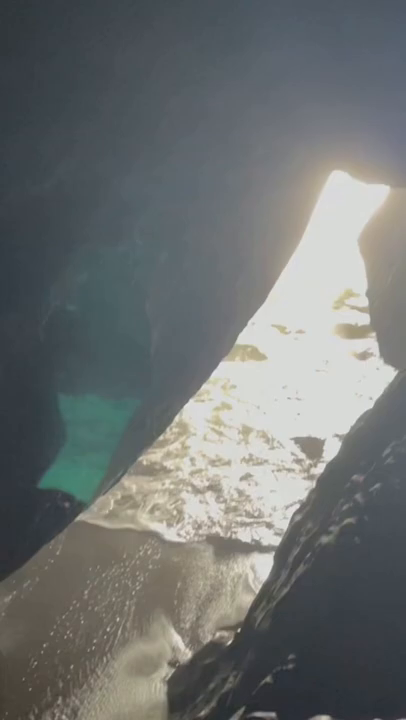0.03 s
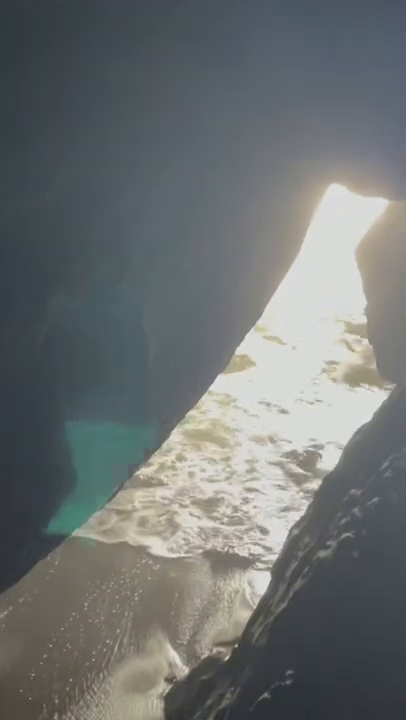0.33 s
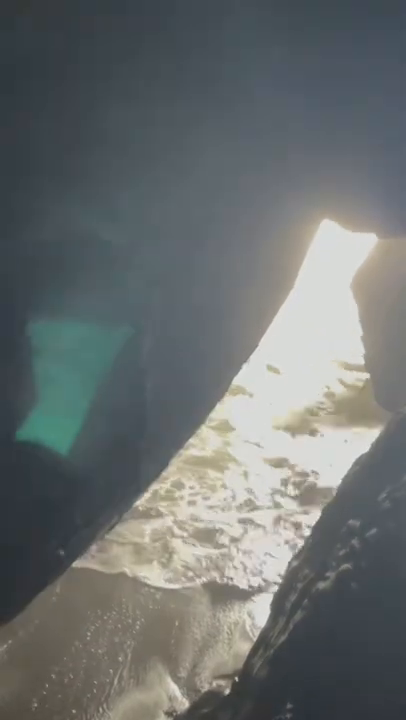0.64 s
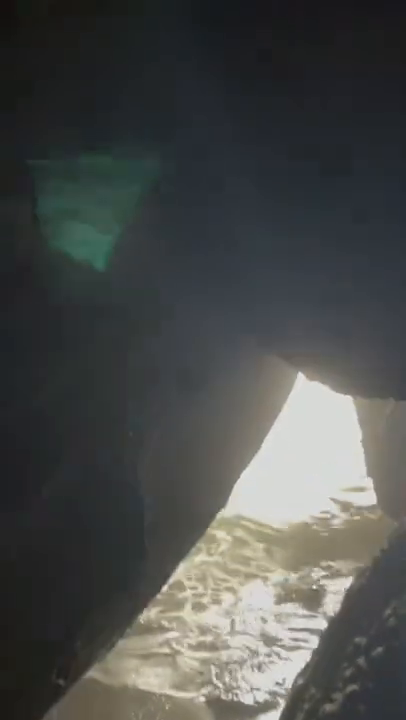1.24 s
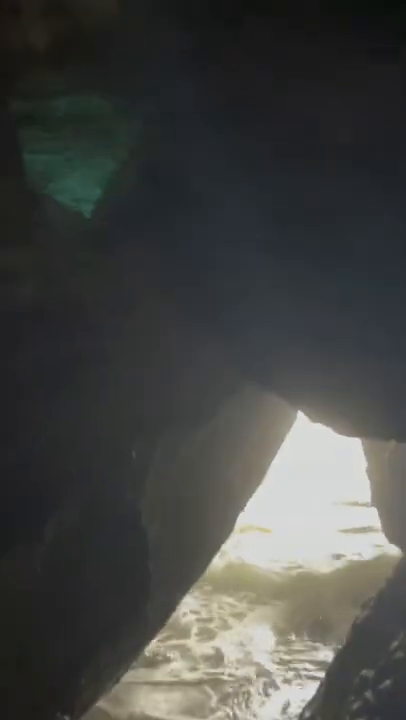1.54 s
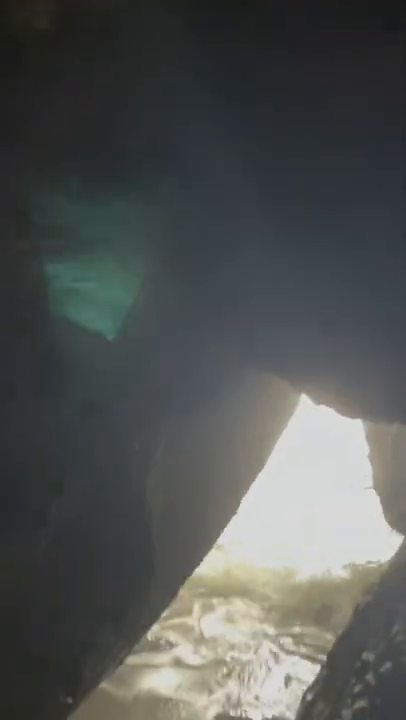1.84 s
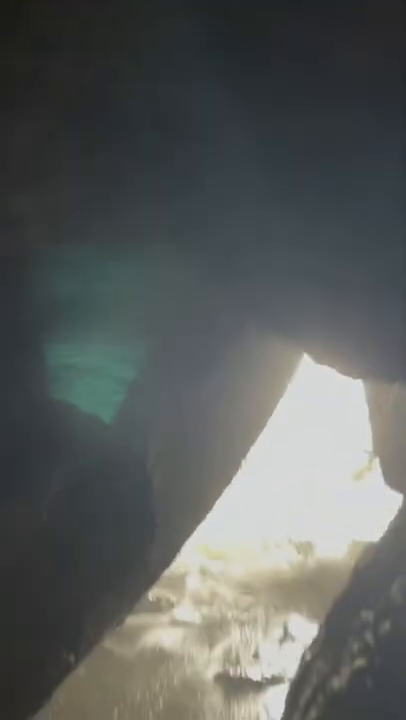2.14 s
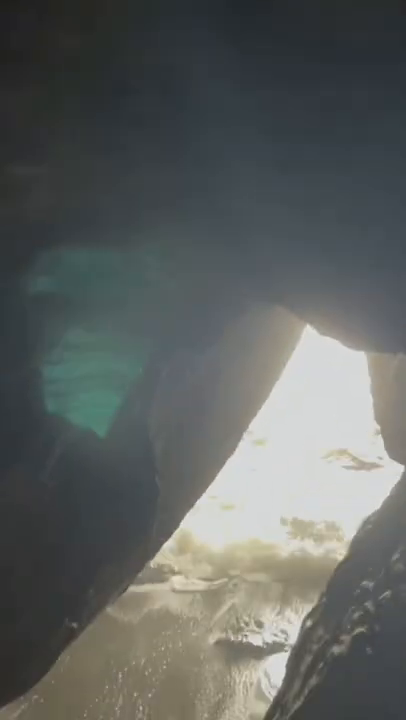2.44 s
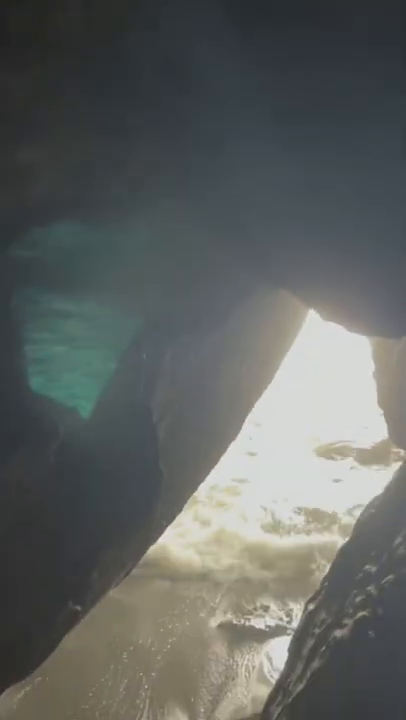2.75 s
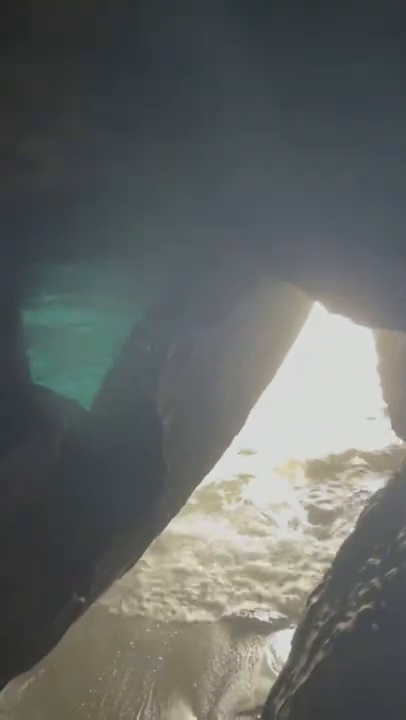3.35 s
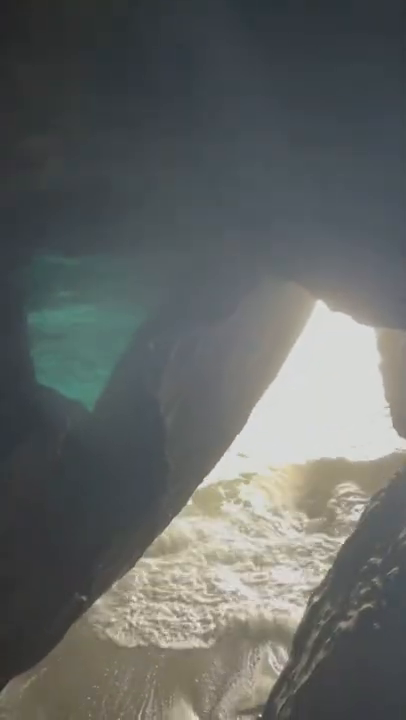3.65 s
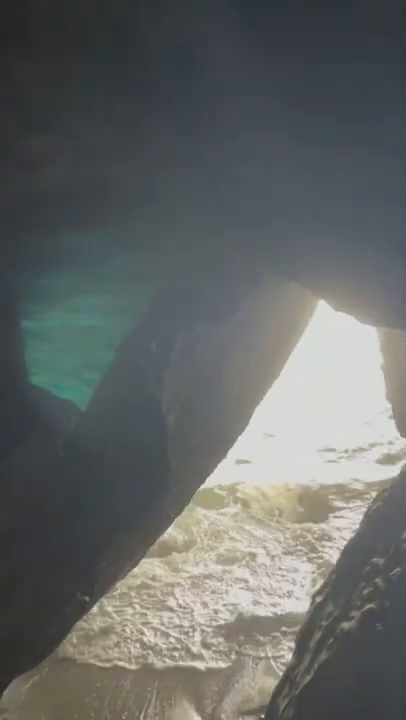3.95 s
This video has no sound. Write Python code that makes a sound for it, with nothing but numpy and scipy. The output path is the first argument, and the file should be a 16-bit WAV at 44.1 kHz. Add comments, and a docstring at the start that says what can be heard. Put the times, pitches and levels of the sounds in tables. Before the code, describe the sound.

Ocean surf roars low and steady, heard from inside a slightly hollow sea cave, with brief dull booms among the rocks throughout. From about 1.3 seconds a wave builds at the opening, breaking at 2 seconds with a deep rumble and bubbling gurgle. It stays loud until about 3 seconds while foam hisses up the sand. From around 3.3 seconds the wash dies back toward the steady sea roar.

```python
"""The open sea roars steadily beyond the mouth of a sea cave, with dull booms among the rocks
where water traps air in hollows. Then one wave breaks at the opening: its roar swells over the deep
rumble of tumbling water, folded-in air gurgles as bubbles, and its foam hisses up the sand and
dies back. All of it is heard from inside, coloured by the cave's resonances and faint short echoes."""
import sys
import numpy as np
from scipy import signal
from scipy.fft import rfft, irfft
from scipy.io import wavfile
from scipy.ndimage import uniform_filter1d, map_coordinates

SR = 44100
rng = np.random.default_rng(int(sys.argv[2]) if len(sys.argv) > 2 else 0)


def inscribe(sig):
    """Save sig as 16-bit PCM at rate SR to the path in sys.argv[1].

    A 1-D sig is mono; a 2-D sig holds one channel per row.
    Samples are clipped to [-1, 1] before scaling.
    """
    pcm = np.round(np.clip(np.atleast_2d(sig).T, -1, 1) * 32767)
    wavfile.write(sys.argv[1], SR, pcm.astype(np.int16))


N = 176400
T = np.arange(N) / SR
F = np.maximum(np.arange(N // 2 + 1) * SR / N, 1)


def undb(db):
    """Decibels to gain."""
    return 10 ** (np.asarray(db) / 20)


def fader(rows):
    """Gain over time from (time_s, level_db) points."""
    return undb(np.interp(T, *np.array(rows).T))


def across(rows):
    """(freq_hz, value) points joined on a log-frequency axis."""
    hz, value = np.array(rows).T
    return np.interp(np.log(F), np.log(hz), value)


def wander(rate_hz):
    """Smooth random motion with a spread of 1."""
    motion = irfft(rfft(rng.standard_normal(N)) / (1 + (F / rate_hz) ** 4) * F / (F + 2), N)
    return motion / motion.std()


def pan(x, left_db):
    """Lean a stereo sound to one side; left_db is left minus right."""
    return x * undb(np.array([[left_db], [-left_db]]) / 2)


# How alike left and right are: freq_hz, correlation
STEREO_LIKENESS = [(60, 0.88), (250, 0.91), (600, 0.71), (1200, 0.59), (1750, 0.3), (2200, 0.64),
                   (4000, 0.58), (6000, 0.77), (9000, 1), (14000, 0.6)]
def place(spectra, colour_db):
    """Two unrelated spectra become a coloured stereo pair, narrow in the bass, widest in the upper mids."""
    likeness = np.clip(across(STEREO_LIKENESS), 0, .97)
    mid = spectra[0] * np.sqrt((1 + likeness) / 2)
    side = spectra[1] * np.sqrt((1 - likeness) / 2)
    return irfft(np.array([mid + side, mid - side]) * undb(colour_db), N)


def churn(colour, surge_db, flicker_db, flicker_hz):
    """Turbulent water: octave bands of noise that surge together and flicker alone."""
    noise = rfft(rng.standard_normal((2, N))) * np.sqrt(SR / 2)
    surge = surge_db * wander(rate_hz=4.2)
    out = 0
    for octave in range(4, 15):
        band = np.maximum(1 - np.abs(np.log2(F) - octave), 0)
        out = out + irfft(noise * band, N) * undb(surge + flicker_db * wander(flicker_hz))
    return place(rfft(out), across(colour))


def pops(per_s, spread_db):
    """Two random trains of clicks of uneven size, rms 1."""
    hits = rng.random((2, N)) < per_s / SR
    polarity = rng.choice([-1, 1], (2, N))
    size = undb(spread_db * np.minimum(rng.exponential(size=(2, N)), 4))
    clicks = hits * polarity * size
    return clicks / (clicks.std() + 1e-12)


def cave_echo(x, t60_s=0.56, wet_db=-14):
    """Rock walls add a short dense tail."""
    tail = rng.standard_normal((2, SR)) * undb(-60 * T[:SR] / t60_s)
    tail *= undb(wet_db) / np.sqrt(np.sum(tail ** 2) / 2)
    return x + signal.fftconvolve(x, tail, axes=1)[:, :N]


# Resonances of the cave: freq_hz, width_hz, lift_db
CAVE_MODES = [(55, 10, 2), (187, 17, 1.5), (316, 24, 2), (447, 42, 3), (573, 29, 3.5), (790, 46, 1)]
def cave_hollow(x):
    """The cave's resonances lift a few narrow bands in the bass and low mids."""
    lift_db = sum(db / (1 + (2 * (F - hz) / width) ** 2) for hz, width, db in CAVE_MODES)
    return irfft(rfft(x) * undb(lift_db), N)


# Short echo taps: delay_s, gain
ECHO_TAPS = [(.00092, 0.053), (.00302, 0.04), (.0093, .06), (0.0198, 0.071)]
def drifting_echoes(x, drift_s=.00015, drift_hz=.7):
    """Faint short echoes with slowly drifting delays give the water a shifting, comb-like colour."""
    out = x
    for delay_s, gain in ECHO_TAPS:
        read_at = (T - delay_s - drift_s * wander(drift_hz)) * SR
        out = out + gain * np.array([map_coordinates(channel, [read_at], order=1) for channel in x])
    return out


# Tone of the open sea: freq_hz, level_db
SEA_COLOUR = [(18, -78), (30, -75), (46, -50.5), (90, -51.5), (200, -57), (400, -63.5), (900, -67),
              (1300, -70.5), (2000, -75), (2750, -83), (4000, -85), (6500, -92.5), (10000, -97.5),
              (15000, -103)]
# Its slow heave: time_s, level_db
SEA_HEAVE = [(0, -0.5), (.43, 0.94), (.75, 0.1), (.98, -0.4), (1.35, 0.1), (2, -1), (4, 0.7)]
def open_sea():
    """Water churning beyond the mouth lays down a steady, gently heaving roar."""
    return churn(SEA_COLOUR, surge_db=0.5, flicker_db=1.08, flicker_hz=24.7) * fader(SEA_HEAVE)


# Tone of the noise in a boom: freq_hz, level_db
BOOM_COLOUR = [(20, -73), (45, -44), (80, -41.5), (150, -46), (280, -49.5), (450, -65), (1000, -104)]
# Boom cues: peak_s, level_db, half_length_s, pitch_hz
BOOM_CUES = [(0.171, 3.5, 0.013, 88), (0.67, -3, .02, 115), (.711, 0, 0.0063, 170),
             (0.754, -3.5, 0.0089, 72), (0.805, -3, .012, 150), (0.835, -7, .01, 68), (.868, 3, .0085, 95),
             (1.204, -1.5, .018, 130), (1.448, -2, .011, 90), (1.52, -8, 0.033, 100),
             (1.607, -4.5, .015, 92), (2.093, 5, 0.014, 85), (2.284, 4, .009, 160), (2.477, 5.5, .016, 88),
             (2.578, 1.5, .016, 75), (2.646, 2, 0.019, 90), (2.74, 1.5, .024, 110), (3.093, 4, .013, 95),
             (3.275, -2, .028, 135), (3.646, 3.5, .013, 125)]
def booms(tone_db=-22.5, noise_db=-4.5, sag_oct_per_s=16):
    """Air trapped by water in rock hollows throbs briefly, sagging in pitch, in a swell of low noise."""
    noise = rfft(rng.standard_normal((2, N))) * np.sqrt(SR / 2)
    low = place(noise, across(BOOM_COLOUR) + noise_db)
    power = np.mean(np.abs(signal.hilbert(low)) ** 2, axis=0)
    low = low * np.sqrt(power.mean() / uniform_filter1d(power, size=500))  # even out the noise
    out = 0
    for (peak_s, db, half_s, hz), phase in zip(BOOM_CUES, rng.random(len(BOOM_CUES))):
        pitch_hz = hz * 2 ** (-sag_oct_per_s * np.clip(T - peak_s, -2 * half_s, 2 * half_s))
        throb = np.sqrt(2) * undb(tone_db) * np.sin(2 * np.pi * (phase + np.cumsum(pitch_hz) / SR))
        swell = np.exp(-.5 * ((T - peak_s) / half_s) ** 2)
        out = out + (low + throb) * undb(db) * swell
    return out


# Tone of the foam: freq_hz, level_db
FOAM_COLOUR = [(500, -80), (1500, -64), (2700, -71), (3800, -70.5), (5300, -74), (6500, -77), (9000, -78.5),
               (11000, -82), (13500, -82), (15500, -114)]
# Its run up the sand: time_s, level_db
FOAM_SWELL = [(0, -38), (1.3, -26), (1.7, -13.2), (1.85, -5.5), (2.0, -1), (2.25, -1.7), (2.6, 1),
              (2.88, -1.5), (3.0, 0), (3.24, -0.8), (3.3, -4.4), (3.5, -7.7), (3.68, -8), (4, -9)]
def foam(spray_per_s=2700, spray_db=-13):
    """Foam on the sand: a smooth hiss with the fine crackle of bursting spray tucked under it."""
    hiss = churn(FOAM_COLOUR, surge_db=0.76, flicker_db=.5, flicker_hz=25)
    crackle = rfft(pops(spray_per_s, spread_db=0.5)) * np.sqrt(SR / 2)
    spray = place(crackle, across(FOAM_COLOUR) + spray_db)
    return (hiss + cave_echo(spray)) * fader(FOAM_SWELL)


def bubbles(pitches=20, per_s=800, decay_cycles=17, tilt_db_per_oct=-3.5):
    """Air folded into the wave rings as brief notes that rise a little."""
    out, t = 0, T[:SR // 10]
    for hz in np.geomspace(350, 4000, pitches) * np.exp(0.039 * rng.standard_normal(pitches)):
        age = t * hz / decay_cycles
        rise = 1 + 0.075 * np.minimum(age, 2)
        note = np.sin(2 * np.pi * hz * t * rise) * np.exp(-2 * age)
        note *= undb(tilt_db_per_oct * np.log2(hz / 1000)) / np.linalg.norm(note)
        triggers = pops(per_s / pitches, spread_db=-1.5)
        out = out + signal.oaconvolve(triggers, note[None], axes=1)[:, :N]
    return cave_echo(place(rfft(out / out.std()), colour_db=-35.5))


# Tone of the wave's low weight and of its roar: freq_hz, level_db
RUMBLE_COLOUR = [(18, -70), (30, -71), (46, -44), (88, -40.5), (125, -44.5), (190, -43), (280, -58),
                 (500, -64), (1000, -102)]
ROAR_COLOUR = [(60, -82), (160, -50), (280, -50), (400, -49), (600, -51.5), (900, -54.5), (1300, -58),
               (2000, -62), (2750, -71), (4000, -74.5), (7000, -82.5), (15000, -105)]
# How each builds and falls away: time_s, level_db
RUMBLE_SWELL = [(0, -36), (1.3, -16.5), (1.8, -12), (2.05, -1), (2.4, -0.3), (2.7, 0), (2.95, -3.5),
                (3.3, -7.5), (3.6, -6), (4, -14.5)]
ROAR_SWELL = [(0, -31), (1.1, -26), (1.4, -16.5), (1.72, -12), (1.9, -6), (2.03, -0.7), (2.17, -1),
              (2.38, -0.5), (2.49, 0.8), (2.62, -0.7), (2.8, -2.2), (3.02, -4.5), (3.22, -2), (3.48, -9),
              (3.7, -9.5), (4, -10)]
def breaker():
    """The mass of water tumbles: rumble below, roar and bubbles above."""
    rumble = churn(RUMBLE_COLOUR, surge_db=-0.1, flicker_db=0.5, flicker_hz=20)
    roar = churn(ROAR_COLOUR, surge_db=.5, flicker_db=1.37, flicker_hz=33.3)
    return rumble * fader(RUMBLE_SWELL) + (roar + bubbles()) * fader(ROAR_SWELL)


def scene():
    """All the water, coloured by the hollow of the cave and faint drifting echoes."""
    background = pan(open_sea() + booms(), left_db=-0.1)
    water = background + pan(breaker(), left_db=-0.5) + foam()
    return drifting_echoes(cave_hollow(water))


# Stereo balance: freq_hz, left_minus_right_db
STEREO_BALANCE = [(60, 1), (150, -1.8), (500, -0.3), (1900, 0), (2800, 3.5), (4000, 1), (5200, 2.5),
                  (7000, -0.5)]
def record(dry, lag_s=.00018, lag_above_hz=5200, start_s=.036, top_hz=14100):
    """Treble reaches the left channel slightly late; the sound opens abruptly, its top cut."""
    left, right = rfft(dry)
    lean = undb(across(STEREO_BALANCE) / 2)
    late = np.exp(-2j * np.pi * F * lag_s * (F > lag_above_hz))
    fade_in = np.clip((T - start_s) * 1000, 0, 1)  # 1 ms
    heard = irfft(np.array([left * lean * late, right / lean]), N) * fade_in
    return signal.sosfilt(signal.ellip(10, .2, 80, top_hz, fs=SR, output="sos"), heard)


dry = scene()
out = record(dry)
inscribe(out)
```